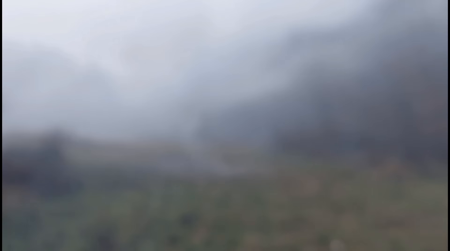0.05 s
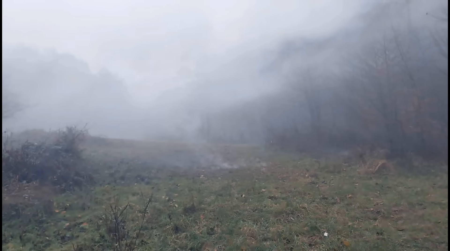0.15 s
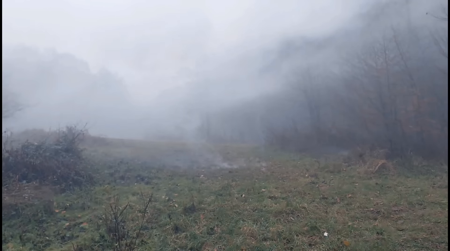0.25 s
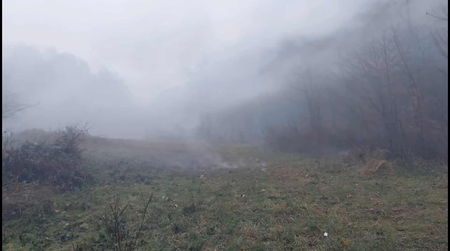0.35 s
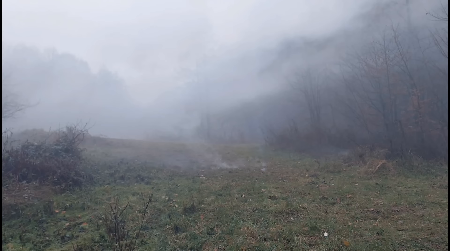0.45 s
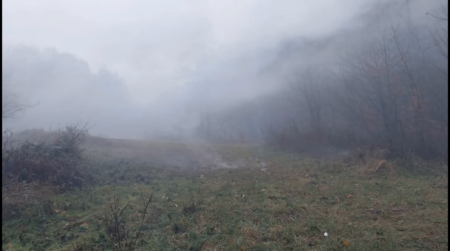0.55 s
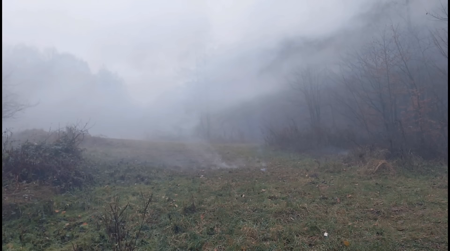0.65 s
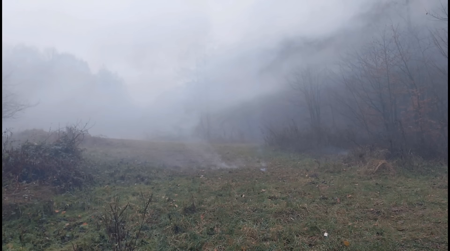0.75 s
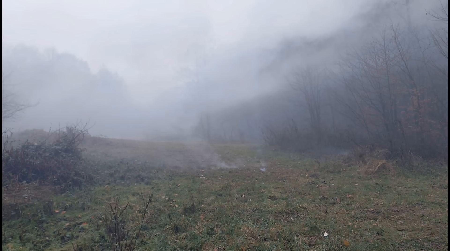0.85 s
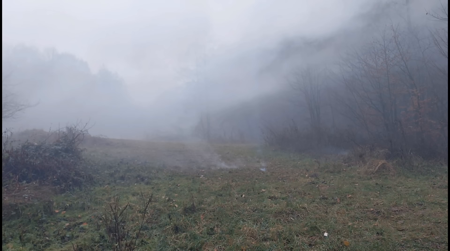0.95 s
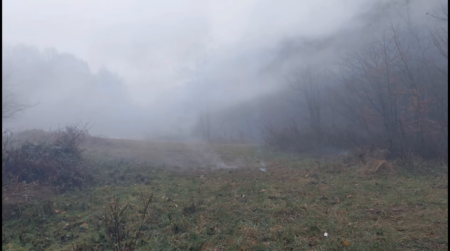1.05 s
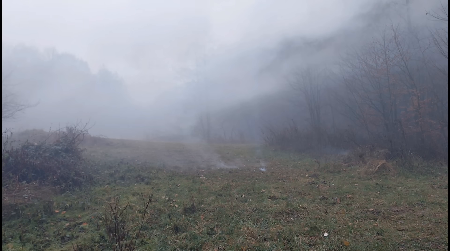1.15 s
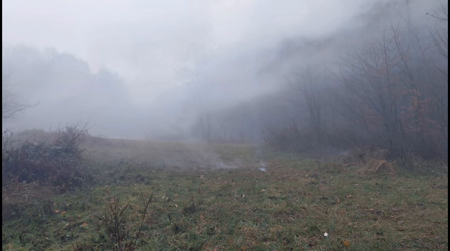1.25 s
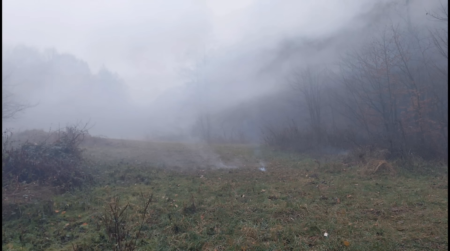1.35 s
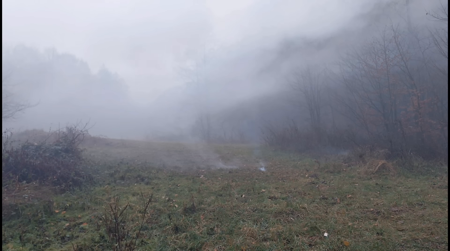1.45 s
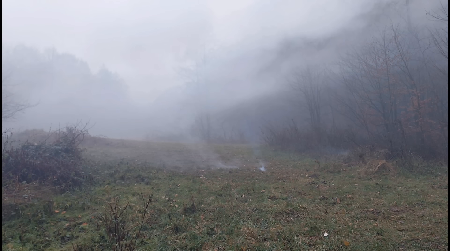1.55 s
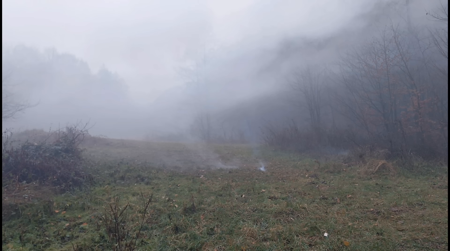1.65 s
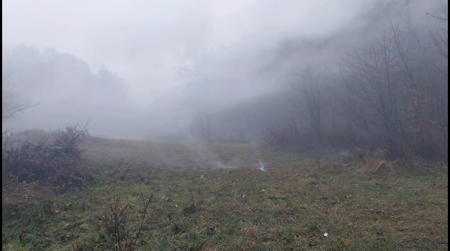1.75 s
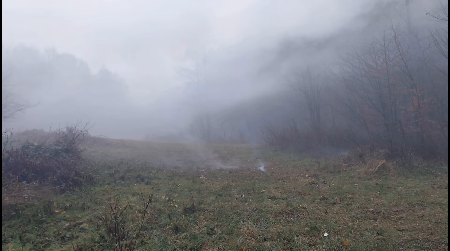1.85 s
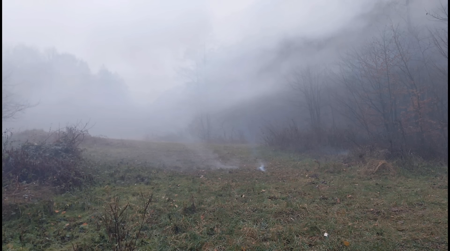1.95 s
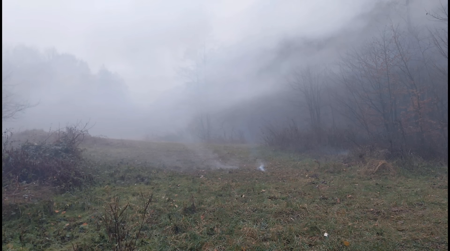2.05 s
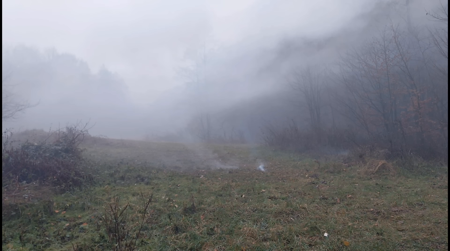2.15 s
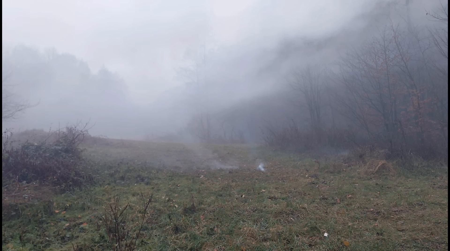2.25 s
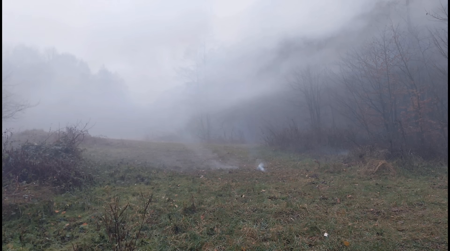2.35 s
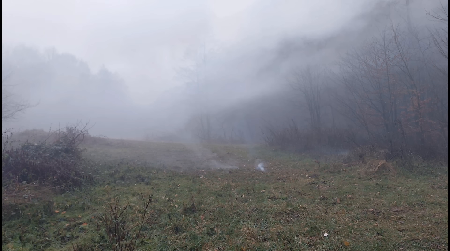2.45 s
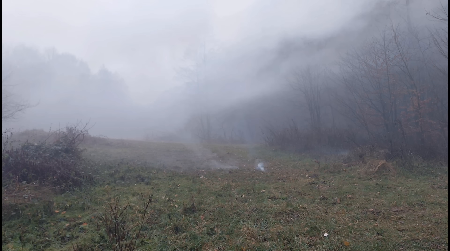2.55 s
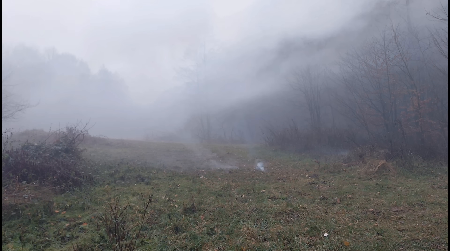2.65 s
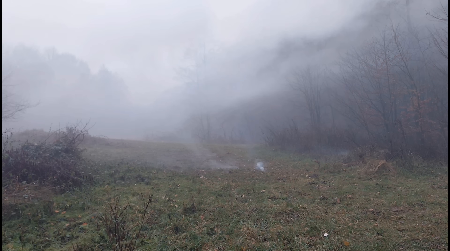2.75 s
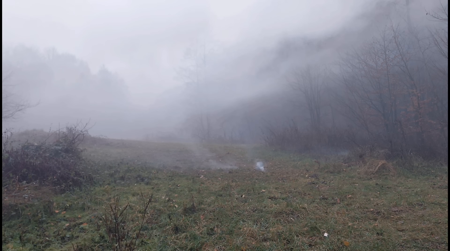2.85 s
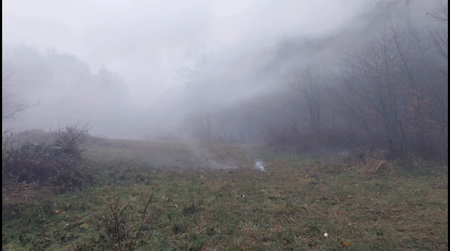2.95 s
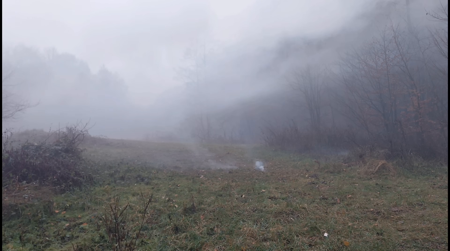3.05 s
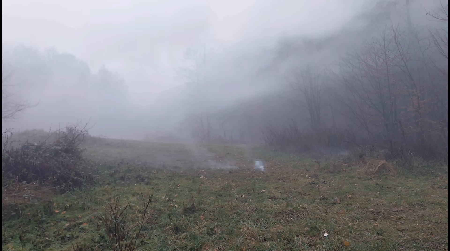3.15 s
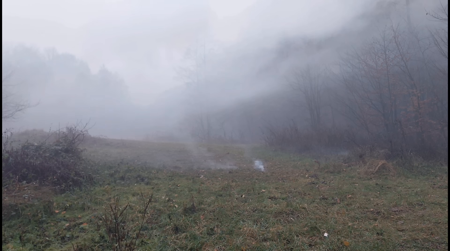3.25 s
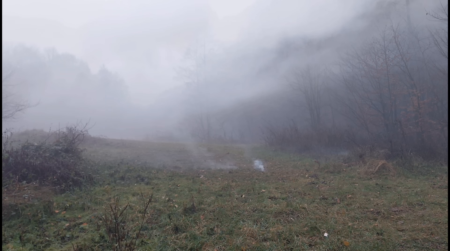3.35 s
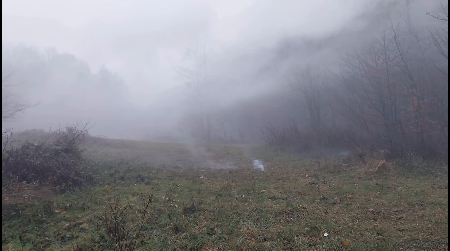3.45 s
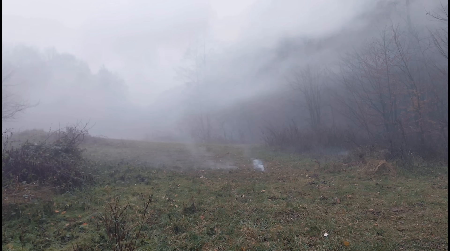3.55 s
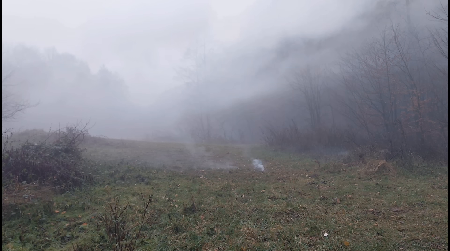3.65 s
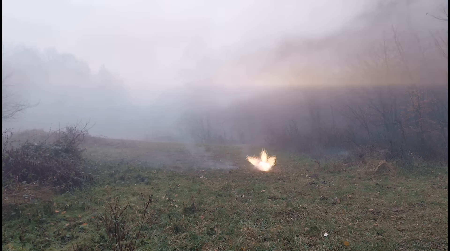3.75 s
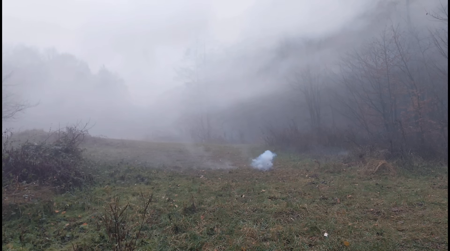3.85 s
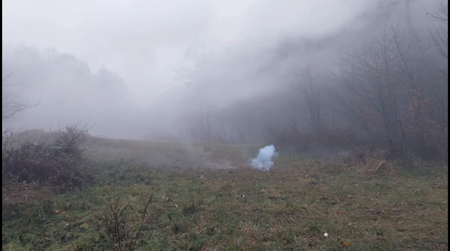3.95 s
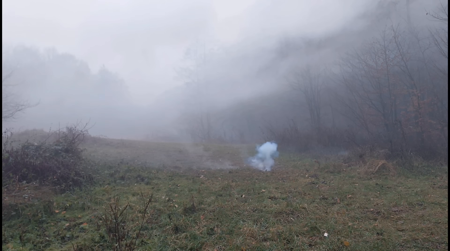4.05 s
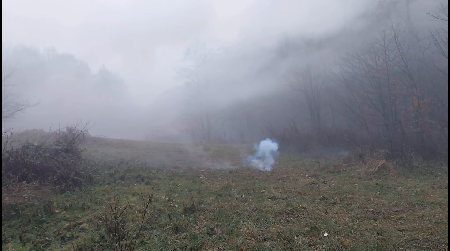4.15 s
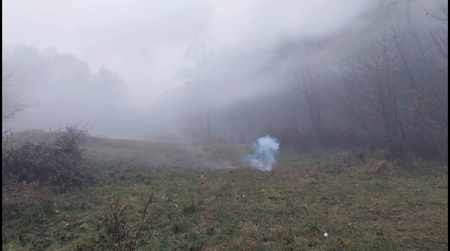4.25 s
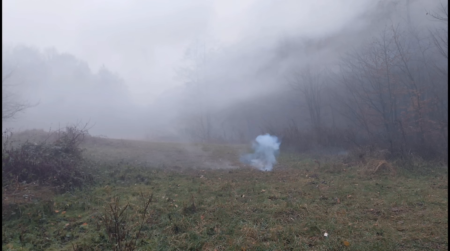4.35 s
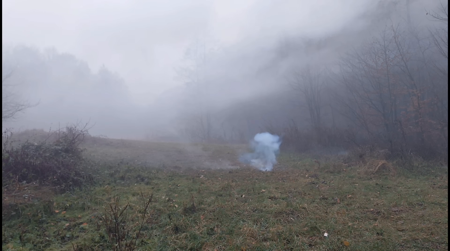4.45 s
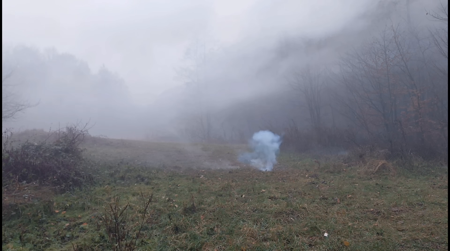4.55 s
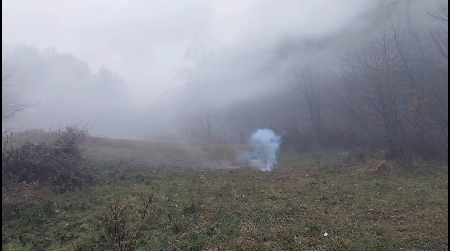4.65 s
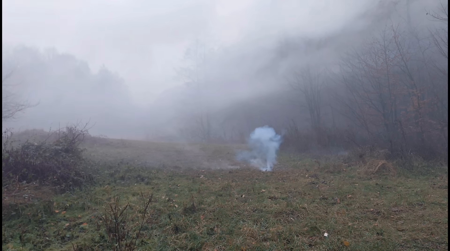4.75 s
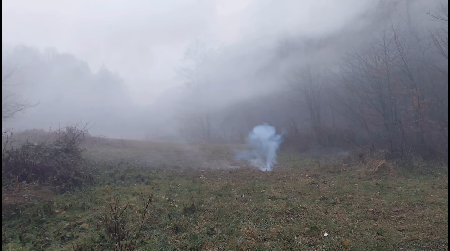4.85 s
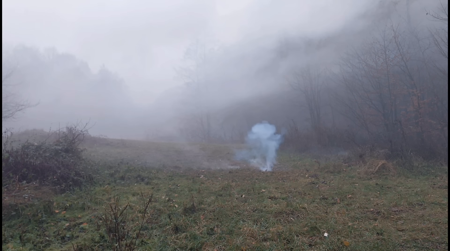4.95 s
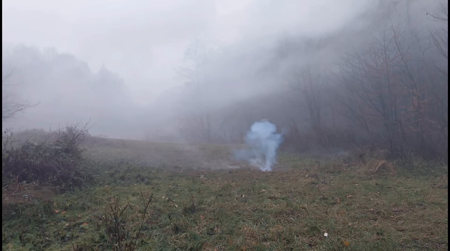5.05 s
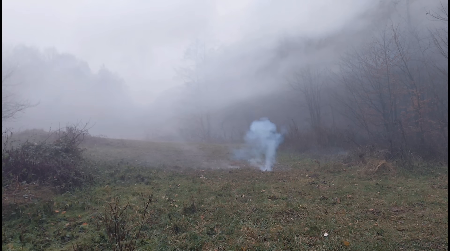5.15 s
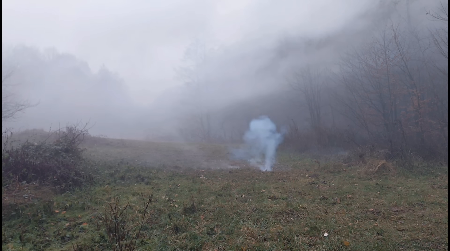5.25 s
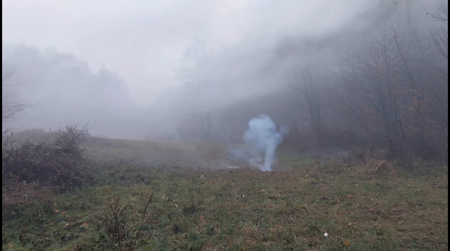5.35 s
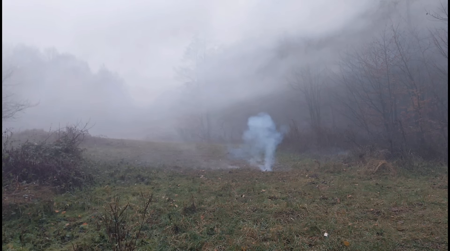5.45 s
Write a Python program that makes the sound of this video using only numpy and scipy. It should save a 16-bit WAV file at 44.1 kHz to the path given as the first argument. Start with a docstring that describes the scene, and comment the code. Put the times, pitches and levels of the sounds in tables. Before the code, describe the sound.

After faint rustling and ticks, a single firecracker cracks loudly outdoors, its echoes rolling back from the woods and slowly fading.

```python
"""A firecracker goes off on a foggy meadow ringed by woods, heard from some way off on two microphones close together.
The bang is one N-shaped pressure wave with low ringing, a rasp and a thin, dying hiss.
Filtered clicks make single echoes; dense random impulses make the bright wash and the long, ever duller roll.
Shaped noise makes the clothes that rustle, scrape and tick softly, mostly while the fuse burns.
A thin top hiss comes and goes; underneath lie the still air, a far rumble and a light breeze.
"""
import sys
import numpy as np
from scipy import signal
from scipy.fft import rfft, irfft, next_fast_len
from scipy.io import wavfile

SR = 44100
rng = np.random.default_rng(int(sys.argv[2]) if len(sys.argv) > 2 else 0)


def bounce(signal):
    """Save signal as a 16-bit WAV file at the path given by the first command-line argument."""
    frames = np.transpose(np.atleast_2d(signal))
    limited = np.clip(frames, -1, 1)
    pcm = np.round(limited * 32767).astype(np.int16)
    wavfile.write(sys.argv[1], SR, pcm)


N = 242538
TIME = np.arange(N) / SR
BANG_S = 3.8580   # when the shock wave arrives
PORT_LAG_S = .00048   # sound's travel time from one microphone to the other


def from_db(db):
    """Turn decibels into a gain."""
    return 10 ** (np.asarray(db) / 20)


def rms_one(x):
    """Scale to an average power of 1."""
    return x / np.sqrt(np.mean(x ** 2) + 1e-20)


def at_hz(points, hz):
    """Read a curve of f/Hz and dB on a log-frequency axis."""
    at, value = np.transpose(points)
    return np.interp(np.log(np.maximum(hz, 1)), np.log(at), value)


def coloured(x, spectrum):
    """Make some frequencies stronger than others, then bring the power to 1."""
    size = next_fast_len(N)
    hz = np.arange(size // 2 + 1) * SR / size
    shaped = rfft(x, size) * from_db(at_hz(spectrum, hz))
    return rms_one(irfft(shaped, size)[..., :N])


def band(x, low_hz, high_hz, order=1):
    """Keep the frequencies between two limits, with a filter that never looks ahead."""
    sos = signal.butter(order, [low_hz, high_hz], "band", fs=SR, output="sos")
    return signal.sosfilt(sos, x + 1e-18)   # the tiny offset only keeps the filter fast in silence


def panned(left_db):
    """Gains that make the left channel this much louder than the right."""
    return from_db(np.array([[left_db], [-left_db]]) / 2)


def add(out, sound, s):
    """Mix a short sound in at time s."""
    start = int(round(s * SR))
    out[start:start + len(sound)] += sound[:N - start]


def arrivals(per_s, spread_db, unlike):
    """Random impulses from all around; each reaches the two microphones with the lag of its bearing."""
    chance, bearing = rng.random((2, N))
    happens = chance < per_s / SR
    sizes = rng.standard_normal(N) * from_db(spread_db * rng.standard_normal(N)) * happens
    lag = np.round(PORT_LAG_S * SR * np.cos(np.pi * bearing)).astype(int)
    shade = unlike * rng.standard_normal(N)   # the housing shades one side or the other
    first = sizes * (1 + shade)
    second = np.bincount((np.arange(N) + lag) % N, sizes * (1 - shade), N)
    return np.array([first, second])


def drift(per_s):
    """A slow random wander with spread 1."""
    knots = rng.standard_normal(N // 100)
    return np.interp(TIME * per_s, np.arange(len(knots)), knots) / np.sqrt(2 / 3)


def bump(s, length):
    """A bell-shaped gain that peaks at 1 at time s; length is its standard deviation in seconds."""
    return np.exp(-.5 * ((TIME - s) / length) ** 2)


SWELL_SHAPE = 1.35   # 1 gives a pointed swell, 2 a rounded one


def swell(s, rise, fall):
    """Gain that climbs to 1 at time s and dies away; 1/e one rise before and one fall after."""
    distance = np.abs((TIME - s) / np.where(TIME < s, rise, fall))
    return np.exp(-np.minimum(distance ** SWELL_SHAPE, 30))


def together(gains):
    """Unrelated sounds add in power."""
    return np.sqrt(sum(gain ** 2 for gain in gains))


# tone colour of still outdoor air: f/Hz, relative level/dB
AIR_COLOUR = [(20, -11), (35, -10), (58, -1), (90, -5.5), (150, -14.5), (300, -13.5), (600, -23.5),
              (1500, -27.5), (3000, -34), (5500, -24.5), (10000, -33), (15000, -30)]
# tone colour of the breeze at the microphones: f/Hz, relative level/dB
BREEZE_COLOUR = [(15, 1), (40, -9), (100, -4), (300, -27.5), (1000, -57)]
AIR_DB, BREEZE_DB = -70, -84.5   # breeze: its level before the gusts


def meadow(lumps_db=1.2, gust_db=6.5):
    """A faint even hiss over a far rumble that comes in lumps, and a light breeze at the microphones."""
    air = from_db(AIR_DB) * coloured(arrivals(per_s=35000, spread_db=0.5, unlike=0.59), AIR_COLOUR)
    rumble = signal.sosfiltfilt(signal.butter(2, 450, fs=SR, output="sos"), air)
    lumps = from_db(lumps_db * drift(per_s=6.6))
    eddies = coloured(rng.standard_normal((2, N)), BREEZE_COLOUR)   # each microphone has its own
    gusts = from_db(BREEZE_DB + gust_db * drift(per_s=2.4))
    # the rumble is already in the air, so only its change is added
    return air + rumble * (lumps - 1) + gusts * eddies * panned(left_db=4.0)


# strokes of cloth over cloth: t/s at full speed, rise/s, fall/s,
# swish level/dB, coarse rubbing level/dB relative to the swish
CLOTH_STROKES = [(.15, 0.23, 0.36, -73, -7.5), (.52, 0.04, 0.081, -73.5, -5), (.9, 0.12, 0.23, -65, -6.5),
                 (1.289, 0.1, 0.053, -57, 0), (1.43, 0.11, .06, -63.5, -16), (1.62, 0.14, 0.16, -56.5, 4.5),
                 (1.89, 0.39, 0.2, -59, -17), (2.679, 0.16, 0.42, -70.5, -27), (3.02, 0.2, 0.38, -67, -6.5),
                 (3.831, 0.22, 0.22, -62, -1)]
# the thin top hiss also flares by itself: t/s at its height, rise/s, fall/s, level/dB
TOP_HISS_FLARES = [(.03, 0.13, 0.27, -68), (.385, 0.019, 0.31, -61.5), (.81, 0.087, 0.25, -65),
                   (1.28, 0.091, 0.07, -54.5), (1.41, 0.044, .08, -61), (1.605, 0.024, 0.074, -55),
                   (3.03, 0.12, 0.18, -67.5), (3.82, 0.11, .1, -58), (4.36, .1, .13, -69),
                   (4.83, .17, 0.11, -67)]
# tone colour of the thin top hiss: f/Hz, relative level/dB
TOP_HISS_COLOUR = [(7000, -18.5), (9800, -9), (11500, -1), (15500, -2)]
TOP_HISS_DB = -4.5   # top hiss heard along with a stroke, relative to the swish
TOP_HISS_GROWTH = 0.74   # dB of top hiss per dB of swish


def top_hiss():
    """A thin top hiss that comes and goes: treble noise that swells by itself and along with the strokes."""
    gains = [from_db(db) * swell(s, rise, fall) for s, rise, fall, db in TOP_HISS_FLARES]
    for s, rise, fall, swish_db, _ in CLOTH_STROKES:
        gains.append(from_db(swish_db + TOP_HISS_DB) * swell(s, rise, fall) ** TOP_HISS_GROWTH)
    noise = coloured(rng.standard_normal((2, N)), TOP_HISS_COLOUR)
    return together(gains) * noise * panned(left_db=-3.5)


# small ticks and snaps nearby: t/s, peak level/dB, f/Hz
TICKS_NEARBY = [(.285, -57, 1170), (0.94, -44.5, 4440), (1.106, -59, 1280), (1.369, -48.5, 990),
                (1.369, -46.5, 4530), (1.483, -37.5, 1870), (1.484, -42, 7000), (1.493, -41.5, 7160),
                (1.508, -43.5, 776), (1.582, -39, 1030), (1.603, -57, 2600), (1.635, -34, 2280),
                (2.470, -55.5, 2940), (2.471, -55, 7000), (2.768, -57.5, 2400), (2.947, -61, 900),
                (3.089, -64, 1100), (3.173, -59, 990), (3.257, -56.5, 795), (3.367, -52.5, 1140),
                (3.453, -57, 714), (3.609, -56, 530), (3.713, -57, 700), (4.624, -47, 6060)]


def ticks(t60=0.01, width=1.5):
    """Each tick is a snap and a brief burst of friction around a pitch of its own."""
    out, age = np.zeros((2, N)), TIME[:SR // 20]
    for s, db, hz in TICKS_NEARBY:
        # one part shared by both channels, one part separate
        friction = rng.standard_normal(len(age)) + 0.91 * rng.standard_normal((2, len(age)))
        snap = 9 * (age == 0)
        force = friction * from_db(-60 * age / t60) + snap
        bursts = band(force, hz / width, hz * width, order=3)
        for channel, burst in zip(out, bursts):
            add(channel, from_db(db) * burst / np.abs(burst).max(), s)
    return out


# folds of cloth scraping: t/s at the loudest, length/s (standard deviation), level/dB, f/Hz
CLOTH_SCRAPES = [(0.126, 0.047, -71.5, 297), (1.281, 0.045, -55.5, 1550), (1.286, 0.025, -61.5, 900),
                 (1.44, 0.039, -63, 1600), (1.514, 0.039, -56, 1350), (1.72, 0.058, -66.5, 170),
                 (1.806, 0.014, -63.5, 830), (3.394, 0.013, -68.5, 284)]


def scrapes(width=1.23):
    """A fold dragged across another sounds a broad pitch that swells and fades."""
    slips = arrivals(per_s=4800, spread_db=0.5, unlike=0.79)
    out = np.zeros((2, N))
    for s, length, db, hz in CLOTH_SCRAPES:
        pitch = rms_one(band(slips, hz / width, hz * width, order=2))
        out += from_db(db) * bump(s, length) * pitch
    return out


# tone colour of coarse rubbing: f/Hz, relative level/dB
RUB_COLOUR = [(50, -23.5), (100, -3), (170, -3.5), (400, -3), (850, 0.5), (1500, -1.5), (2700, -6.5),
              (4000, -9), (6000, -35.5)]
# tone colour of sliding cloth: f/Hz, relative level/dB
SWISH_COLOUR = [(1200, -15), (2800, -4.5), (4200, -1), (6000, -2), (8000, -5), (10000, -14.5),
                (14000, -24.5)]
RUB_GROWTH = 0.99   # dB of rubbing per dB of swish within a stroke


def clothes():
    """Fibres catch and slip: coarse rubbing under pressure, a fine swish when the cloth just slides."""
    rubs, swishes = [], []
    for s, rise, fall, db, rub_db in CLOTH_STROKES:   # the strokes listed above top_hiss
        speed = swell(s, rise, fall)
        swishes.append(from_db(db) * speed)
        rubs.append(from_db(db + rub_db) * speed ** RUB_GROWTH)
    catches = arrivals(per_s=3600, spread_db=2.5, unlike=0.52)
    slides = arrivals(per_s=25000, spread_db=1.0, unlike=0.64)
    rub = together(rubs) * coloured(catches, RUB_COLOUR)
    swish = together(swishes) * coloured(slides, SWISH_COLOUR) * panned(left_db=2.5)
    return rub + swish


# the shock reaches the tree line and comes back after this delay; the scattered sound builds up over EDGE_S
TREE_LINE_S, EDGE_S = .05, 0.0081


def scatter(db, db_per_doubling, db_per_s):
    """Gain of the sound coming back from ever deeper in the woods."""
    age = np.maximum(TIME - BANG_S, 0)
    build_up = .5 + .5 * np.tanh((age - TREE_LINE_S) / (2 * EDGE_S))
    doublings = np.log2(np.maximum(age / TREE_LINE_S, 1))
    return build_up * from_db(db - db_per_doubling * doublings - db_per_s * age)


# ground and air take the extremes away as the echoes travel further:
# f/Hz, loss/dB per second, relative to the other frequencies
DISTANCE_LOSS = [(60, 20), (150, 5.5), (350, -1.5), (1000, -0.5), (2000, 3), (3200, 10), (5000, 19.5),
                 (7000, 33), (10000, 58.5), (15000, 79.5)]


def travelled(x, spectrum):
    """Later arrivals have come further and lost more of their extremes; the power stays 1."""
    hz, s, frames = signal.stft(coloured(x, spectrum), SR, nperseg=1024)
    kept = from_db(-np.outer(at_hz(DISTANCE_LOSS, hz), np.maximum(s - BANG_S, 0)))
    power = from_db(at_hz(spectrum, hz)) ** 2
    power_left = power @ kept ** 2 / power.sum()
    return signal.istft(frames * kept / np.sqrt(power_left), SR)[1][:, :N]


# bushes, dense stands and far slopes each return a surge:
# t/s at its height, rise/s, fall/s, low roll level/dB, bright wash level/dB
WOOD_SURGES = [(3.867, 0.011, 0.033, -26, -33), (3.926, 0.017, 0.015, -20, -27),
               (3.995, .018, 0.0085, -27, -37), (4.069, .01, 0.022, -24, -42),
               (4.14, 0.031, 0.054, -29.5, -52), (5.2, 0.12, 0.72, -46.5, -56.5),
               (5.5, 0.077, 0.16, -42.5, -51.5)]
# tone colour of the low roll at the bang: f/Hz, relative level/dB
ROLL_COLOUR = [(25, -40), (42, -37), (62, -4), (85, -11), (120, -7), (170, -7.5), (230, -5), (320, -1.5),
               (500, -1), (680, -7), (900, -17.5), (1500, -31)]
# tone colour of the bright wash at the bang: f/Hz, relative level/dB
WASH_COLOUR = [(350, -31), (700, -2.5), (950, -2.5), (1300, -2), (2000, -4.5), (3000, -8.5), (5000, -9.5),
               (7000, -13), (10000, -18.5), (12500, -12.5), (16000, -14.5)]
# scatter from the depth of the woods: level before build-up and losses,
# loss per doubling of the path, loss to the foliage
ROLL_DB, ROLL_DB_PER_DOUBLING, ROLL_DB_PER_S = -22.5, 2, 11
WASH_DB, WASH_DB_PER_DOUBLING, WASH_DB_PER_S = -20, 4, 11.5


def woods(lumps_db=0.4):
    """Trunks and slopes send back a lumpy low roll, countless twigs a fine bright wash."""
    rolls = [scatter(ROLL_DB, ROLL_DB_PER_DOUBLING, ROLL_DB_PER_S)]
    washes = [scatter(WASH_DB, WASH_DB_PER_DOUBLING, WASH_DB_PER_S)]
    for s, rise, fall, roll_db, wash_db in WOOD_SURGES:
        surge = swell(s, rise, fall)
        rolls.append(from_db(roll_db) * surge)
        washes.append(from_db(wash_db) * surge)
    uneven_db = lumps_db * drift(per_s=30)
    trunks = arrivals(per_s=2500, spread_db=2.0, unlike=0.23)
    twigs = arrivals(per_s=16000, spread_db=1.0, unlike=0.24)
    roll = together(rolls) * from_db(uneven_db) * travelled(trunks, ROLL_COLOUR)
    wash = together(washes) * from_db(uneven_db / 2) * travelled(twigs, WASH_COLOUR)
    return (roll + wash) * (TIME > BANG_S) * panned(left_db=-2.74)


# single strong echoes: t/s, peak level of the thud/dB, bearing (-1 to 1, above 0 reaches the left first)
STRONG_ECHOES = [(3.87, -23, .1), (3.9225, -24, -.3), (3.9596, -12.5, .2), (3.9638, -10.5, -.2),
                 (3.986, -14.5, .3), (4.0614, -21, -.2), (4.068, -20, .1), (4.077, -21.5, .2),
                 (4.103, -19.5, -.3), (4.444, -27.5, .2), (4.551, -36, -.2), (4.865, -43, .2),
                 (5.076, -35.5, 0), (5.168, -49, .1), (5.211, -41.5, -.2), (5.413, -34, .4),
                 (5.433, -34, -.3)]
ECHO_LOW_HZ, ECHO_HIGH_HZ = 292, 622
# echoes keep some of the crack: its level relative to the thud, its loss with travel time, its decay
CRACK_DB, CRACK_DB_PER_S, CRACK_T60_S = -10, 15, 0.041
CRACK_LOW_HZ, CRACK_HIGH_HZ = 800, 2600


def echoes():
    """Tree lines and slopes return dull thuds a few cycles long, with a remnant of crack that is strongest nearby."""
    thud = band(signal.unit_impulse(SR // 20), ECHO_LOW_HZ, ECHO_HIGH_HZ, order=2)
    thud = thud / np.abs(thud).max()
    fade = from_db(-60 * TIME[:len(thud)] / CRACK_T60_S)
    out = np.zeros((2, N))
    for s, db, bearing in STRONG_ECHOES:
        crack_gain = from_db(CRACK_DB - CRACK_DB_PER_S * (s - BANG_S))
        for channel, side in zip(out, (-.5, .5)):
            noise = band(rng.standard_normal(len(thud)), CRACK_LOW_HZ, CRACK_HIGH_HZ, order=2)
            crack = crack_gain * fade * rms_one(noise)
            add(channel, from_db(db) * (thud + crack), s + side * bearing * PORT_LAG_S)
    return out


# tone colour of the fine hiss that trails the shock: f/Hz, relative level/dB
SIZZLE_COLOUR = [(1000, -8), (3000, 5), (6500, 0.5), (10000, -9), (13000, 2.5), (16000, -7)]
SIZZLE_DB, SIZZLE_T60_S = -34, .33   # level at its start, time to fall by 60 dB


def sizzle():
    """The crack frays into a thin hiss that dies quickly."""
    age = TIME - BANG_S
    fade = from_db(SIZZLE_DB - 60 * np.maximum(age, 0) / SIZZLE_T60_S) * (age > 0)
    return fade * coloured(rng.standard_normal((2, N)), SIZZLE_COLOUR)


def lead_in(s=3.8545, length=0.0009, level_db=-18, hz=550):
    """A soft, dull bump runs just ahead of the crack."""
    wave = np.cos(2 * np.pi * hz * (TIME - s))
    return from_db(level_db) * bump(s, length) * wave * panned(left_db=4.5)


# low ringing that the shock leaves behind: f/Hz, level/dB at its start, time to fall by 60 dB/s
BOOM_RINGING = [(93, -19.5, 0.081), (159.4, -23, 0.19), (238, -42, 0.13), (308, -11.5, 0.098),
                (483, -12, 0.034), (900, -45, 0.023)]
# the microphones rasp as each shock front hits: t/s, level/dB, length/s (standard deviation)
FRONT_RASPS = [(3.8576, -12, 0.00022), (3.8596, -16, 0.00039)]
# tone colour of the rasp: f/Hz, relative level/dB
RASP_TONE = [(500, 2), (1000, 13.5), (2000, 5), (4500, -8.5), (7000, -4), (10000, -7.5), (13000, 5),
             (16000, -0.5)]
SHOCK_S, SHOCK_DB = .0023, -4.5   # length of the N wave, and its peak before filtering


def bang(rumble_cut_hz=58, shock_top_hz=3000):
    """An N-shaped pressure wave, the ringing after it and a rasp on both of its fronts."""
    age = np.maximum(TIME - BANG_S, 0)
    n_wave = (2 * age / SHOCK_S - 1) * (age > 0) * (age < SHOCK_S)
    blast = from_db(SHOCK_DB) * band(n_wave, low_hz=12, high_hz=shock_top_hz)
    since = np.maximum(age - SHOCK_S / 2, 0)   # the ringing starts at the middle of the wave
    for hz, db, t60 in BOOM_RINGING:
        blast = blast + from_db(db - 60 * since / t60) * np.sin(2 * np.pi * hz * since)
    # a small charge has no deep bass
    bass_cut = signal.butter(4, rumble_cut_hz, "high", fs=SR, output="sos")
    blast = signal.sosfilt(bass_cut, blast + 1e-18)
    fronts = sum(from_db(db) * bump(s, length) for s, db, length in FRONT_RASPS)
    return blast + fronts * coloured(rng.standard_normal((2, N)), RASP_TONE)


def scene():
    """The bang and its echoes over the small sounds of the meadow."""
    firecracker = lead_in() + bang() + sizzle() + echoes() + woods()
    return firecracker + clothes() + scrapes() + ticks() + top_hiss() + meadow()


# the two microphones differ in colour: f/Hz, left minus right level/dB
MIC_DIFFERENCE = [(200, 2.5), (1300, 0.5), (2400, 2.5), (4400, -2), (8000, 6), (10500, 1.5), (13500, -2.5)]
CUTOFF_HZ = 15900


def record(dry):
    """Each microphone has its own colour; peaks are clipped at full scale, then the top is cut."""
    size = next_fast_len(N)
    tilt_db = at_hz(MIC_DIFFERENCE, np.arange(size // 2 + 1) * SR / size)
    mic_gains = from_db(np.outer([.5, -.5], tilt_db))
    heard = irfft(rfft(dry, size) * mic_gains, size)[:, :N]
    top_cut = signal.ellip(12, .1, 90, CUTOFF_HZ, fs=SR, output="sos")
    return signal.sosfilt(top_cut, np.clip(heard, -1, 1))


dry = scene()
out = record(dry)
bounce(out)
```